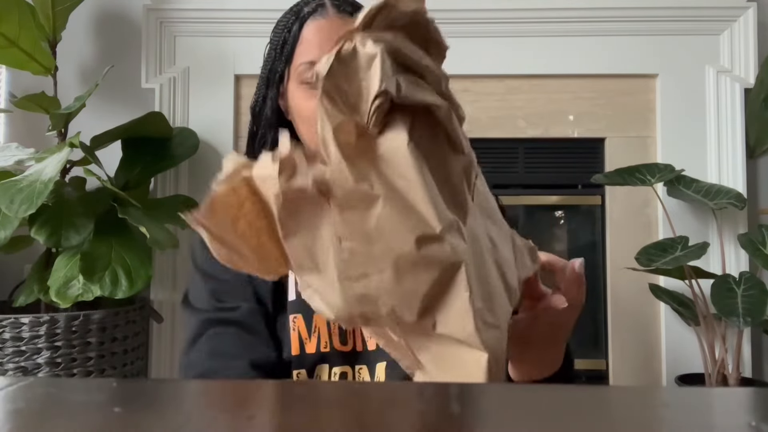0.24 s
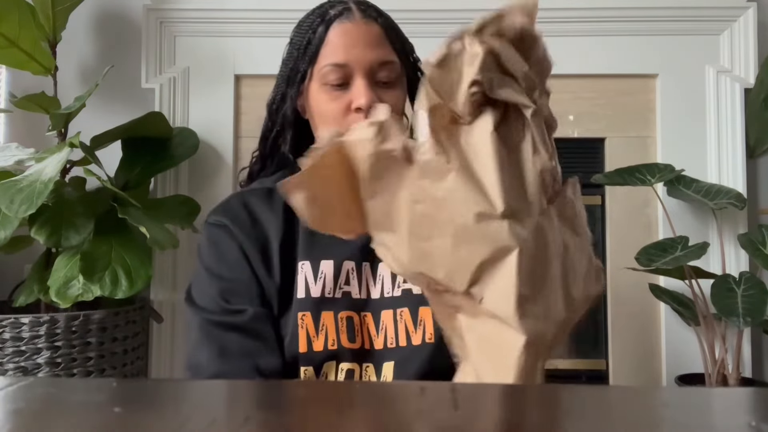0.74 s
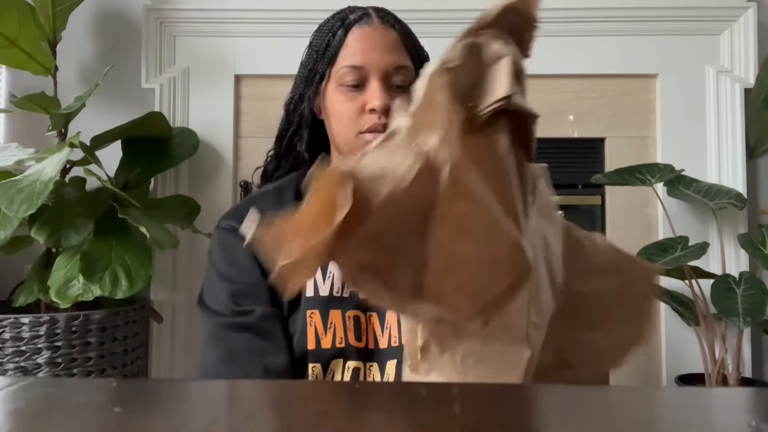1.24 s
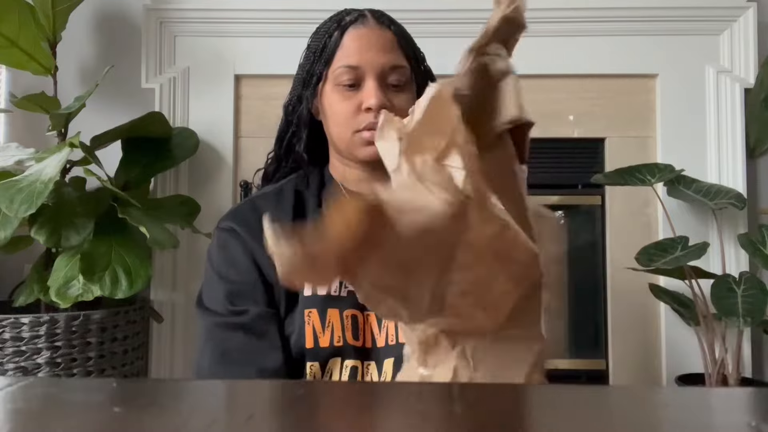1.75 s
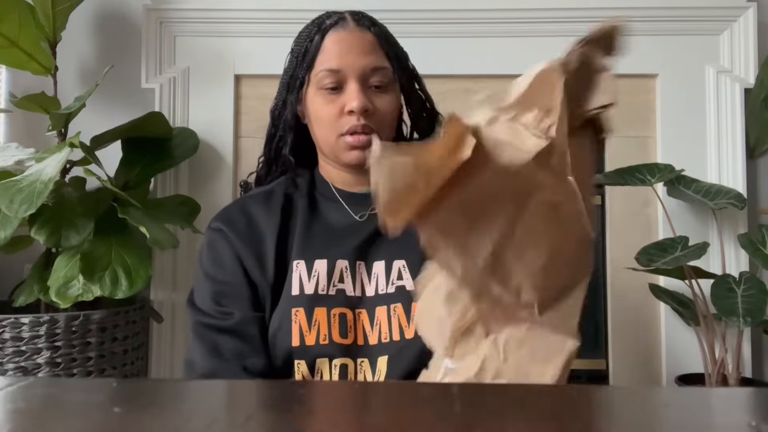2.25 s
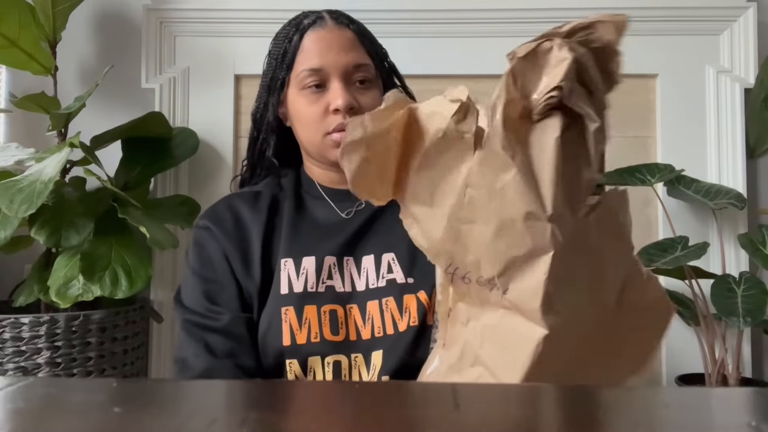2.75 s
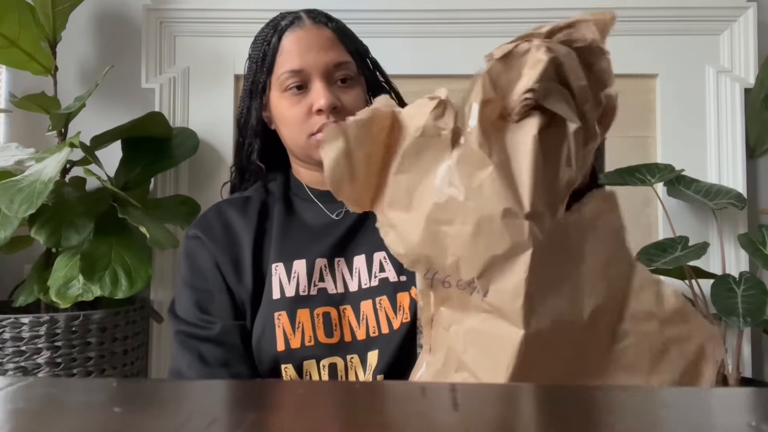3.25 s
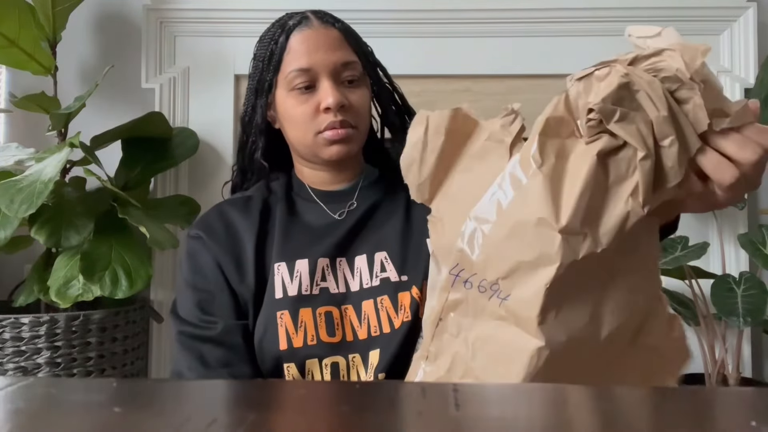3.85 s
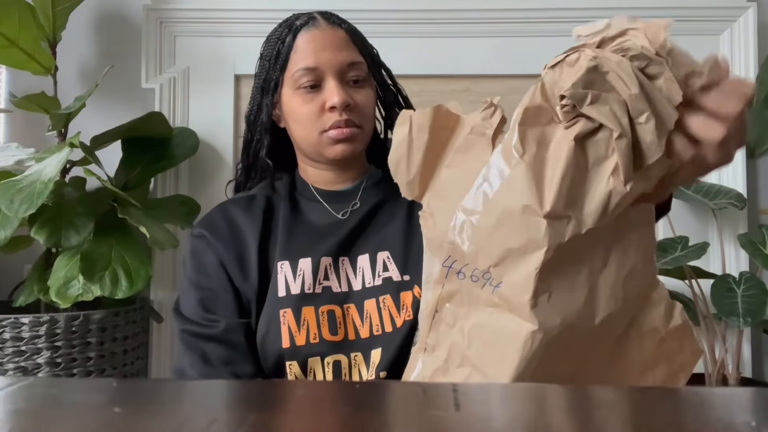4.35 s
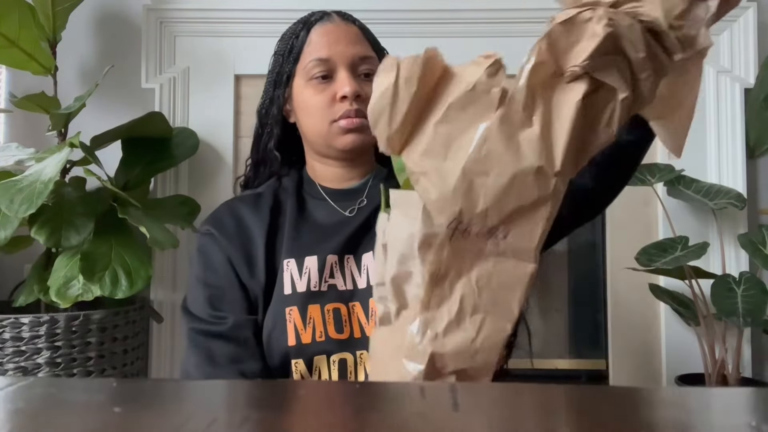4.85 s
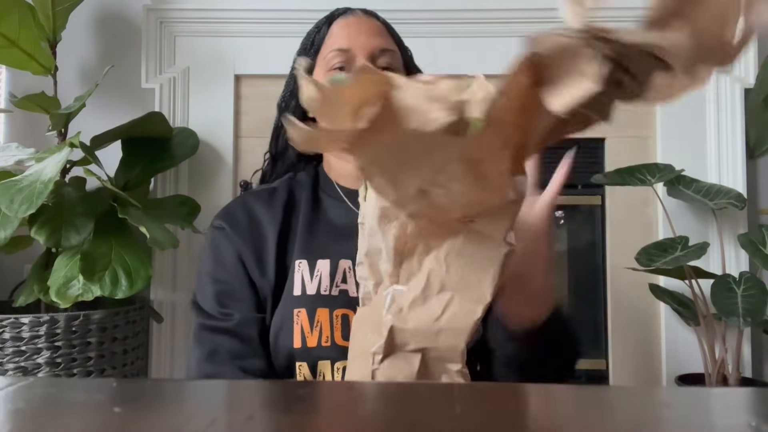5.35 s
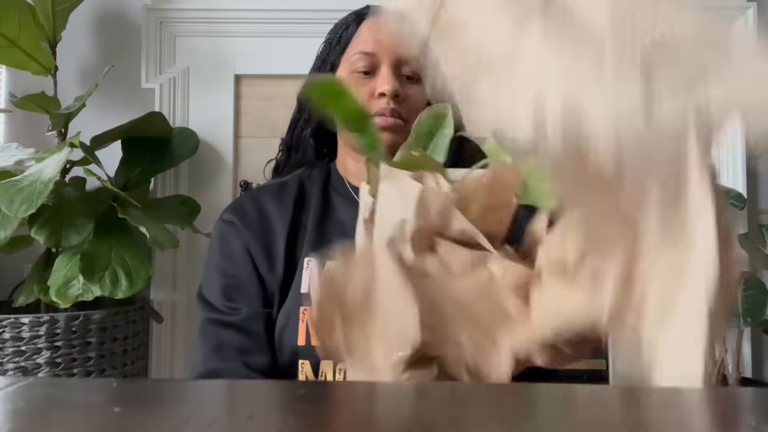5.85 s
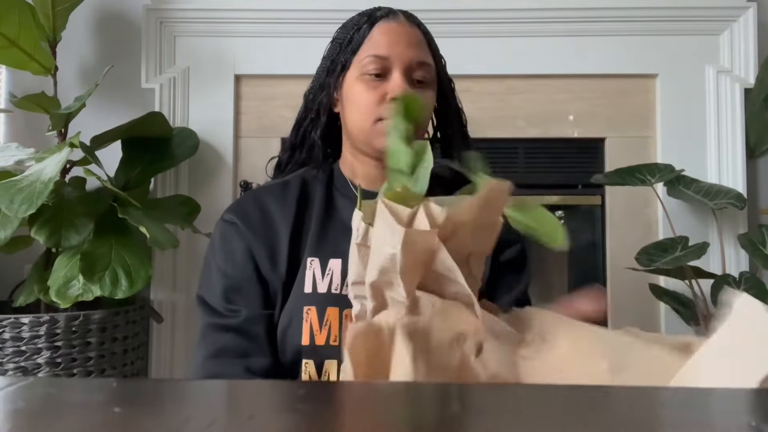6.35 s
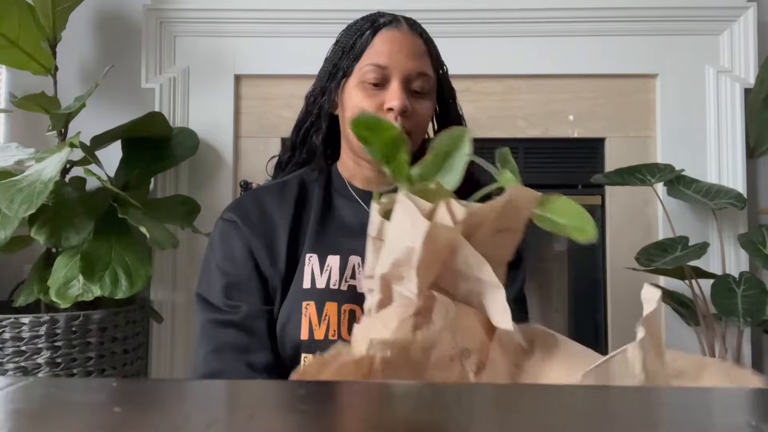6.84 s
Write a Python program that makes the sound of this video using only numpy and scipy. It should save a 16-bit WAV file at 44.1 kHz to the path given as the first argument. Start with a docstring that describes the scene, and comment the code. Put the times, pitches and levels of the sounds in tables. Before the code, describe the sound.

Close, irregular crinkling of stiff wrapping paper being opened by hand indoors, with sharp pops, a scraping pull and dull thuds.

```python
"""A living room, a pair of close microphones; on the table, a little to their right, a potted plant
is pulled out of its brown paper. First the hands work at the bundle: creases buckle in swarms and single
snaps, stiff panels pop and flap, sheet slides over sheet, and the bundle bumps the table. After a lull
near 4 s the outer sheet scrapes through the hand and comes free at about 5 s. The opened paper then
crackles to the end, with a few more bumps. A quiet low rumble lies under it all."""
import sys
import numpy as np
from scipy import signal
from scipy.fft import rfft, irfft, next_fast_len
from scipy.io import wavfile
from scipy.ndimage import uniform_filter1d, map_coordinates

SR = 44100
rng = np.random.default_rng(int(sys.argv[2]) if len(sys.argv) > 2 else 0)


def put_to_file(sound):
    """Save the sound as 16-bit audio at rate SR, in the file named by the first command-line argument."""
    columns = np.atleast_2d(sound).T  # one column per channel
    safe = np.clip(columns, -1, 1)
    whole_steps = np.round(safe * 32767)
    wavfile.write(sys.argv[1], SR, whole_steps.astype(np.int16))


N = 312228

# Squeezes and tugs of the hands, one rustle apiece. Each row: start and length in seconds, effort in dB,
# then extra crinkle, extra sliding and extra panel body in dB.
GRIPS = [(-0.03, 0.04, -36.5, 2, 0.5, -1), (0.065, 0.01, -47.5, 10, -5, 2),
         (0.279, 0.15, -44, -0.5, -6, -1), (0.542, 0.048, -47, 0.5, -3, -1),
         (0.731, 0.104, -43, -9.5, -2, -0.5), (0.938, 0.42, -31.5, -0.5, 0.5, 0.25),
         (1.111, 0.035, -35, -2, 1, 4), (1.237, 0.087, -36, 5, -2, -0.5),
         (1.502, 0.069, -47.5, 5.5, 3, -3.5), (1.731, 0.12, -46, -0.5, -1.5, 0),
         (1.889, 0.13, -47.5, -3, -1, 0.5), (2.076, 0.06, -41, -10.5, -6.5, 1.5),
         (2.189, 0.13, -46.5, 0.5, -0.5, 0), (2.314, 0.082, -46, 2, -2, 0.5),
         (2.654, 0.022, -48, 3, 2, -0.5), (2.684, 0.068, -51.5, -2, 3, -1),
         (2.862, 0.2, -48.5, -1, 4.5, -2.5), (3.058, 0.21, -52, 2, 4.5, -1),
         (3.259, 0.072, -51.5, 1.5, 5.5, 1), (3.546, 0.1, -54.5, 1, -0.5, -1.5),
         (4.113, 0.0095, -72.5, 9, 7, 2), (4.622, 0.09, -39.5, -4, -7, -2.5),
         (4.705, 0.13, -47, -1, 3.5, -1), (4.952, 0.1, -53.5, 11, 8, -22), (5.15, 0.032, -54, 3, -8, 8),
         (5.267, 0.084, -59.5, 10.5, 4.5, -3), (5.488, 0.023, -58, 4, 6, 3),
         (5.509, 0.074, -48.5, 5.5, 0.5, -1.5), (5.607, 0.13, -45.5, 1.5, 3.5, 0.5),
         (5.731, 0.038, -37, 6.5, 3, 2.5), (5.768, 0.12, -35.5, 2, 4, 0), (5.91, 0.12, -42, 3.5, 10, 0),
         (5.972, 0.091, -36.5, 2, 3, 1), (6.111, 0.039, -37, 2.5, 7, -3),
         (6.155, 0.029, -38.5, 3, 4.5, 0.5), (6.231, 0.052, -51, 16, 23, -7),
         (6.313, 0.078, -56, 26, 2, -4), (6.5, 0.11, -52.5, 12, 3.5, 1), (6.575, 0.035, -48.5, 0, 2, -2),
         (6.609, 0.14, -43, -10, -2, 0), (6.854, 0.11, -53, 3.5, 2, -3.5), (6.959, 0.058, -53, 3, 5.5, 0.5)]
# The bundle never quite rests while it is held and turned. Each row: time in seconds, effort in dB.
HOLDING = [(0, -49), (0.5, -56.5), (0.7, -51.5), (0.9, -48.5), (1.48, -50.5), (1.68, -51.5), (2.3, -61.5),
           (2.58, -65.5), (2.82, -52.5), (3.45, -54), (3.7, -58), (3.88, -73.5), (4.02, -68.5), (4.09, -77),
           (4.21, -79.5), (4.4, -53.5), (4.92, -54), (5.1, -49), (5.25, -67), (5.45, -65), (5.75, -48.5),
           (6.55, -53.5), (6.85, -58)]
# Single creases snapping through. Each row: start in seconds, crack level and panel pop level in dB,
# crack pitch and panel pitch in Hz.
SNAPS = [(0.0111, -36, -33, 4500, 1770), (0.0147, -36, -25, 12400.0, 350), (0.072, -25.5, -46, 5140, 600),
         (0.0767, -28, -36.5, 6360, 350), (0.119, -39, -48, 12000.0, 1630.0),
         (0.218, -32, -29.5, 6500, 1520), (0.299, -39, -58, 11400, 730), (0.3178, -36, -49, 5600.0, 1400),
         (0.3206, -42, -31, 4170, 397), (0.365, -33, -44, 9440.0, 991.0), (0.7277, -42, -35.5, 4350, 400),
         (0.788, -35, -46, 3940.0, 425), (1.0069, -33, -27, 5400, 1120), (1.2629, -27, -31, 3230.0, 786.0),
         (1.4447, -36, -37, 5240, 947.0), (1.4552, -37, -43, 5210.0, 969.0), (1.524, -28.5, -37, 4237, 640),
         (1.7322, -26.5, -41, 11700, 937.0), (1.911, -42.9, -39.4, 5830, 1060),
         (1.9432, -24, -34, 5460, 1310), (1.962, -45, -41, 5120.0, 1080.0), (2.096, -33, -39, 6500, 640),
         (2.106, -29, -38, 5740, 1010.0), (2.147, -29, -27.5, 6060, 673), (2.1836, -41, -35, 6000, 640),
         (2.2289, -36, -38, 6050, 1190), (2.4969, -60, -46, 5890.0, 744), (2.665, -52, -41, 6250, 1350.0),
         (2.9689, -29, -34.5, 3630, 408), (3.0215, -40, -37, 4470, 388), (3.1982, -35.5, -43, 4400, 904.0),
         (3.3283, -49, -35.5, 3850.0, 1530), (3.549, -32, -38, 3360, 990),
         (3.802, -50.5, -56, 9840.0, 764.0), (3.89, -65, -38.5, 5490.0, 720),
         (3.906, -43.5, -51, 6000, 560.0), (4.1208, -54, -54, 5750, 386), (4.5452, -25.5, -25, 3430, 470),
         (4.6307, -20, -24, 11100, 710), (4.6429, -25.5, -31, 10400.0, 754.0),
         (4.6644, -35, -25.5, 3580, 797.0), (4.7001, -27, -27.5, 5560, 1390),
         (5.122, -38, -39, 3900, 1500.0), (5.1648, -51, -39.5, 11600.0, 530),
         (5.21, -43.5, -37.5, 4400, 1920), (5.3977, -44, -51, 10500, 517.0),
         (5.5265, -48, -30, 4230.0, 1900), (5.5322, -41, -26.5, 4230.0, 1700),
         (5.6365, -23.5, -28, 12300, 1390), (5.703, -34, -36, 6060, 388.0),
         (5.736, -31, -35, 11500, 1730.0), (5.762, -24, -29, 4480, 367), (6.0037, -22.0, -23, 3450, 785),
         (6.0407, -21, -29, 6000, 656), (6.142, -38, -30, 5300, 1810.0), (6.272, -31, -53, 4470, 441.0),
         (6.42, -39, -38.5, 3930.0, 1540), (6.4646, -37.5, -44, 11800, 353),
         (6.5969, -24.5, -26, 6550, 1680), (6.606, -34, -30.5, 4640, 395),
         (6.622, -27.5, -28.5, 6530, 1940), (6.6665, -41, -29, 3870.0, 890),
         (6.708, -30.5, -35, 5750, 840.0), (6.7291, -45, -31, 4970, 547), (6.943, -41, -39, 4450.0, 1560),
         (6.946, -48, -36, 4450.0, 370)]
# The outer sheet is drawn taut through the hand, then slides onto the table.
# Each row: start in seconds, length in seconds, level in dB.
PULLS = [(4.3, 0.57, -40), (4.913, 0.16, -51.5), (6.224, 0.114, -43.5)]
# Soft bumps on the table. Each row: start in seconds, level in dB, pitch in Hz where the paper settles.
BUMPS = [(0.325, -33, 67), (0.38, -33, 81), (0.415, -37, 143), (1.305, -27.5, 76), (1.353, -32, 126),
         (2.382, -36, 146.5), (3.907, -46, 77), (5.75, -34, 198), (5.826, -32, 157), (6.867, -30, 112),
         (6.908, -41, 136), (6.985, -40, 241), (7.012, -37.5, 143)]

# The tone of each sound at the microphones. Each row: frequency in Hz, relative level in dB.
CRINKLE_TONE = [(400, -65), (1500, 4.5), (3500, -12.5), (5500, 8.5), (7500, 0), (9500, 3.5), (12800, -0.5),
                (14200, -2.5), (16000, -79)]  # swarms of tiny creases
SLIDE_TONE = [(300, -37), (1000, -8.5), (1900, 1), (2700, -2.5), (3500, -4), (5000, -8.5), (8000, -11.5),
              (16000, -38.5)]  # sheet over sheet
BUNCHED_PANEL_TONE = [(70, -28), (180, -4.5), (290, -2.5), (390, 3), (480, -4.5), (620, 0.5), (760, -1),
                      (930, -6), (1200, -3), (1700, -6.5), (2600, -24.5), (5000, -41), (16000, -51)]  # panels of the closed wrapper
OPEN_PANEL_TONE = [(70, -32), (180, -4), (400, 2.5), (520, 0), (680, 3), (1080, -8.5), (1400, -3),
                   (1800, -2.5), (2700, -18.5), (5000, -39), (16000, -53)]  # wide panels of the opened sheet
FLAP_TONE = [(25, -34.5), (60, -11), (110, -7.5), (200, -11.5), (320, -13), (800, -22), (3000, -94.5)]  # panels flapping
CRACK_TONE = [(300, -32), (1500, 2.5), (3000, 8.5), (5500, 7.5), (8000, 7), (11000, 0.5), (13500, -7.5),
              (16000, -21)]  # one long crease giving way
POP_TONE = [(80, -22), (250, -7), (450, -2), (800, 1), (1800, 1), (3000, -8), (8000, -28), (16000, -50)]  # its panel flipping over
SCRAPE_TONE = [(800, -49), (1900, -12), (2400, 3), (2950, 10), (3550, 4.5), (4400, -3), (5500, -7),
               (7000, -6), (11000, -29), (16000, -18)]  # dragged paper
THUD_TONE = [(30, -47), (70, 13), (140, -26), (250, 2.5), (450, -6.5), (1200, -48), (5000, -61)]  # bundle on table
WALL_TONE = [(100, -8.5), (1000, 1.5), (5000, 1), (9000, 1), (16000, 0.5)]  # what the walls throw back
RUMBLE_TONE = [(20, -23), (45, -3), (72, 7.5), (110, 0), (200, -8), (400, -14.5), (1000, -28), (4000, -41),
               (16000, -56)]  # the room's background

# Where the paper is. Each row: time in seconds, lag at the left microphone in ms.
LEFT_LAG = [(0, .15), (1.2, 0.21), (1.8, 0.16), (2.3, 0.2), (3, .22), (3.8, 0.21), (4.4, 0.25), (5.2, 0.27),
            (5.7, 0.19), (6.2, 0.2), (7, 0.16)]
# The living room's tail. Each row: frequency in Hz, seconds to fall by 60 dB.
ROOM_T60 = [(100, 0.5), (500, 0.59), (2000, 0.32), (6000, 0.36), (15000, 0.23)]
# Diffuse sound at the pair. Each row: frequency in Hz, left-right correlation.
DIFFUSE_LIKENESS = [(100, 0.98), (300, 0.57), (600, 0), (1200, 0.18), (16000, 0.51)]
# How wide the stereo sound is spread. Each row: frequency in Hz, gain of side over middle in dB.
STEREO_WIDTH = [(100, 5), (1000, -1.5), (2200, 0.5), (3500, 0), (5500, -0.5), (8000, 14.5), (10000, -5.5),
                (11500, -9), (13000, -15), (15000, 39)]

# How the paper answers effort. Each pair: level in dB at the usual effort, dB gained per dB of effort.
FLAP_LAW, PANEL_LAW, SLIDE_LAW, CRINKLE_LAW = (-49.5, 0.51), (-42, 0.91), (-42.5, 0.88), (-46.5, 1.12)
USUAL_EFFORT_DB = -42


def rustle():
    """Swarms of creases: each gives a bright tick and kicks the panel it borders; sliding sheets hiss."""
    effort_db, crisp_db, slip_db, body_db = handling()
    laws = FLAP_LAW, PANEL_LAW, SLIDE_LAW, CRINKLE_LAW
    flap_db, panel_db, slide_db, crinkle_db = [
        db + slope * (effort_db - USUAL_EFFORT_DB) for db, slope in laws]
    energy = creases(crinkle_db + crisp_db, per_s=620, crowding=0.75, scatter_db=2.3)
    crinkle = amp(crinkle_db + crisp_db) * coloured(shiver(energy, t60=0.005, steady=0.52), CRINKLE_TONE)
    sliding = amp(slide_db + slip_db) * coloured(shiver(energy, t60=0.01, steady=0.42), SLIDE_TONE)
    panels = amp(panel_db + body_db) * panel_ring(shiver(energy, t60=0.014, steady=0.34))
    flapping = amp(flap_db + body_db) * coloured(shiver(energy, t60=0.078, steady=0.62), FLAP_TONE)
    body = dappled(panels + flapping, depth_db=3.2, width_bins=1.2, life_frames=5)
    return body + dappled(crinkle + sliding, depth_db=5.0, width_bins=0.54, life_frames=6.5)


def handling(pull_shake_db=-1.8, sag_db_per_s=-2, release_db_per_s=294.5):
    """Total effort of the hands, then extra crinkle, sliding and body, led by the strongest grip (dB)."""
    power = amp(over_time(HOLDING)) ** 2 + (amp(pull_shake_db) * pulls()) ** 2
    colour = np.zeros((3, N))
    for start, length, db, *extra_db in GRIPS:
        age = np.maximum(np.arange(N) / SR - start, 0)
        attack_s = 0.0079 + 0.12 * length
        # a rustle holds nearly level, and dies when the hand stops
        fall_db = sag_db_per_s * age + release_db_per_s * np.maximum(age - length, 0)
        grip = (np.minimum(age / attack_s, 1) * amp(db - fall_db)) ** 2
        power = power + grip
        colour = colour + np.outer(extra_db, grip)
    return 10 * np.log10(power), *(colour / power)


def creases(level_db, per_s, crowding, scatter_db, patches=3):
    """Energies of tiny buckling creases on a few patches of paper: harder handling sets off more."""
    density = per_s * amp(crowding * (level_db - level_db.mean()))
    buckles = rng.random((patches, N)) < density / (SR * patches)
    return buckles * amp(scatter_db * np.minimum(rng.exponential(size=(patches, N)), 4)) ** 2


def shiver(energy, t60, steady, window=2205):
    """Each crease briefly shakes the sheet's crowded modes, over a share of steady noise; mean power 1."""
    keep = amp(-60 / (t60 * SR)) ** 2
    power = signal.lfilter([1 - keep], [1, -keep], energy)
    local_mean = uniform_filter1d(uniform_filter1d(power.sum(0), window), window)
    power = (1 - steady) * power / (np.abs(local_mean) + 1e-9) + steady / len(energy)
    return np.sqrt(power) * rng.standard_normal(energy.shape)


def panel_ring(kicks, opens_at_s=4.9, opening_s=0.3):
    """The bunched wrapper rings at other pitches than the wide panels of the sheet once it comes free."""
    opened = np.clip((np.arange(N) / SR - opens_at_s) / opening_s, 0, 1)
    return (1 - opened) * coloured(kicks, BUNCHED_PANEL_TONE) + opened * coloured(kicks, OPEN_PANEL_TONE)


def dappled(x, depth_db, width_bins, life_frames, size=256):
    """Every facet of the paper has its own tone: a random colour that keeps changing."""
    spectra = signal.stft(x, nperseg=size)[2]
    field = rng.standard_normal(spectra.shape)
    for axis, reach in ((-2, width_bins), (-1, life_frames)):
        keep = np.exp(-1 / reach)
        field = signal.lfilter([1 - keep], [1, -keep], field, axis=axis)
    gain = unit(amp(depth_db * np.clip(unit(field), -2, 2)))
    return signal.istft(spectra * gain, nperseg=size)[1][:, :N]


def snaps(tick_db=5):
    """A long crease gives way: a tick, a ringing crack that runs along it, the hollow pop of its panel."""
    starts, crack_db, pop_db, crack_hz, panel_hz = np.transpose(SNAPS)
    cracks = bursts(starts, crack_db - 4.5, t60=0.004, attack_s=0.0003, hold_s=0.0014)
    for start, db in zip(starts, crack_db):
        cracks[round(start * SR)] += amp(db + tick_db)
    pops = bursts(starts, pop_db - 1, t60=0.009, attack_s=0.0012, hold_s=0.003)
    crease_rings = rings(starts, crack_db + 4, crack_hz, life_cycles=2.6)
    panel_rings = rings(starts, pop_db + 1, panel_hz, life_cycles=1.4)
    noise = coloured(cracks, CRACK_TONE) + coloured(pops, POP_TONE)
    return crease_rings + panel_rings + dappled(noise, depth_db=2.8, width_bins=15, life_frames=1)


def rings(starts, levels_db, pitches_hz, life_cycles, rise_cycles=0.097, pitch_scatter=0.025):
    """A ridge or panel that has snapped through rings for a few cycles at its own pitch."""
    out, t = np.zeros(N + SR), np.arange(SR // 20) / SR
    for start, db, hz in zip(starts, levels_db, pitches_hz):
        cycles = hz * np.exp(pitch_scatter * rng.standard_normal()) * t
        shape = np.exp(-cycles / life_cycles) * (1 - np.exp(-cycles / rise_cycles))
        out[round(start * SR):][:len(t)] += amp(db) * shape * np.sin(2 * np.pi * cycles)
    return out[:N]


def bursts(starts, levels_db, t60, attack_s, hold_s=0):
    """Puffs of noise that rise, hold for a moment and die."""
    out, t = np.zeros(N + SR), np.arange(SR // 4) / SR
    for start, db in zip(starts, levels_db):
        shape = amp(db - 60 * np.maximum(t - hold_s, 0) / t60) * (1 - np.exp(-t / attack_s))
        out[round(start * SR):][:len(t)] += shape * rng.standard_normal(len(t))
    return out[:N]


def scrape(trim_db=-1):
    """Dragged paper catches and slips many times a second: a rasp whose tone shifts as the contact moves."""
    slips = creases(np.zeros(N), per_s=500, crowding=0, scatter_db=18.0)
    hiss = coloured(shiver(slips, t60=0.019, steady=0.76), SCRAPE_TONE)
    return amp(trim_db) * pulls() * dappled(hiss, depth_db=3.5, width_bins=4, life_frames=12)


def pulls():
    """Scraping strength: each pull speeds up and slows down in one arch."""
    t = np.arange(N) / SR
    return sum(amp(db) * np.sin(np.pi * np.clip((t - start) / length, 0, 1))
               for start, length, db in PULLS)


def bumps(tension=2.5, relax_s=0.00807, note_t60=0.19, swell_s=0.008):
    """The bundle meets the table: a dull thud, and a note that falls as the squashed paper goes slack."""
    notes, t = np.zeros(N + SR), np.arange(SR // 4) / SR
    shape = amp(-60 * t / note_t60) * (1 - np.exp(-t / swell_s))
    for start, db, hz in BUMPS:
        phase = 2 * np.pi * np.cumsum(hz * (1 + tension * np.exp(-t / relax_s))) / SR
        notes[round(start * SR):][:len(t)] += amp(db) * shape * np.sin(phase)
    starts, levels_db, _ = np.transpose(BUMPS)
    thuds = bursts(starts, levels_db - 7.5, t60=0.12, attack_s=0.00082)
    return notes[:N] + coloured(thuds, THUD_TONE)


def microphones(patches, spacing_ms):
    """The close pair: each patch of paper reaches the left side softer, and late by its own angle."""
    lag_ms = over_time(LEFT_LAG)
    offsets_ms = (np.arange(len(patches)) - (len(patches) - 1) / 2) * spacing_ms
    left = sum(map_coordinates(patch, [np.arange(N) - (lag_ms + offset) * SR / 1000], order=3)
               for patch, offset in zip(patches, offsets_ms))
    return np.array([left * amp(-0.62), patches.sum(0) * amp(0.83)])


def living_room(x, hop=8192):
    """The reflections keep changing as the paper moves."""
    out = np.zeros((2, N + 2 * SR))
    x = np.pad(coloured(x, WALL_TONE), ((0, 0), (hop, 2 * hop)))
    for start in range(0, N + hop, hop):
        piece = x[:, start:start + 2 * hop] * np.sin(np.linspace(0, np.pi, 2 * hop))
        echo = signal.fftconvolve(piece, reflections(), axes=1)
        out[:, start:start + echo.shape[1]] += echo
    return out[:, hop:hop + N]


def reflections(early_db=-9, early_t60=0.03, tail_db=-9.5, count=12288):
    """Table and near walls answer within milliseconds; the room's tail dies sooner in the treble."""
    hz, frame_s, spectra = signal.stft(diffuse(count), SR, nperseg=256)
    decay = amp(-60 * frame_s / along(ROOM_T60, hz)[:, None])
    t = np.arange(count) / SR
    tail = signal.istft(spectra * decay, SR, nperseg=256)[1] * (t > 0.005)
    early = diffuse(count) * amp(-60 * t / early_t60) * (t > 0.001)
    return amp(early_db) * early / np.linalg.norm(early[0]) + amp(tail_db) * tail / np.linalg.norm(tail[0])


def room_tone():
    """A quiet low rumble from all around the microphones."""
    return amp(-52.5) * coloured(diffuse(N), RUMBLE_TONE)


def diffuse(count):
    """Stereo noise from all sides: alike in the bass, unrelated near 600 Hz, partly alike above."""
    turn = np.arccos(along(DIFFUSE_LIKENESS, np.fft.rfftfreq(count, 1 / SR))) / 2
    mid, side = irfft(rfft(rng.standard_normal((2, count))) * [np.cos(turn), np.sin(turn)], count)
    return np.array([mid + side, mid - side])


def coloured(x, tone, size=2048):
    """Causal filter with the given tone; white noise keeps its power."""
    gain = unit(amp(along(tone, np.fft.rfftfreq(size, 1 / SR))))
    cepstrum = irfft(np.log(gain))
    cepstrum[1:size // 2] *= 2  # folded for minimum phase
    cepstrum[size // 2 + 1:] = 0
    impulse = irfft(np.exp(rfft(cepstrum)))
    return signal.oaconvolve(np.atleast_2d(x), impulse[None], axes=1)[:, :N]


def along(points, hz):
    """Read (Hz, value) points on a log axis."""
    point_hz, values = np.transpose(points)
    return np.interp(np.log(hz + 1), np.log(point_hz + 1), values)


def over_time(points):
    """Read (seconds, value) points at every sample."""
    return np.interp(np.arange(N) / SR, *np.transpose(points))


def amp(db):
    """Decibels to gain."""
    return 10 ** (np.asarray(db) / 20)


def unit(x):
    """Scale to rms 1."""
    return x / np.sqrt(np.mean(x ** 2) + 1e-20)


def scene():
    """Paper and table close up, the living room behind them."""
    swarms = rustle() + scrape()
    hits = snaps() + bumps()
    direct = microphones(swarms, spacing_ms=0.058) + microphones(hits, spacing_ms=0)
    echo = living_room(swarms.sum(0) + amp(3.0) * hits[0])
    return direct + echo + room_tone()


def record(dry, top_hz=15900):
    """The stereo sound is spread wide near 8 and 15 kHz, narrowed around 10-13 kHz, cut above top_hz."""
    size = next_fast_len(N + SR // 2)
    hz = np.fft.rfftfreq(size, 1 / SR)
    left, right = rfft(dry, size) * (hz < top_hz)
    spread = amp(along(STEREO_WIDTH, hz) / 2)
    mid, side = (left + right) / 2 / spread, (left - right) / 2 * spread
    return irfft([mid + side, mid - side], size)[:, :N]


dry = scene()
out = record(dry)
put_to_file(out)
```